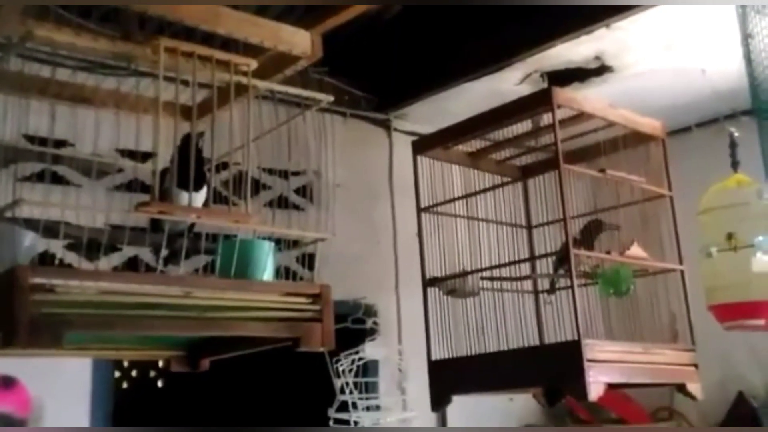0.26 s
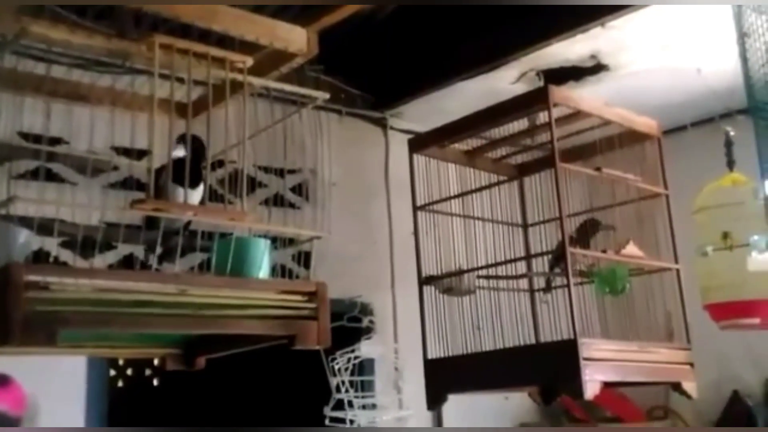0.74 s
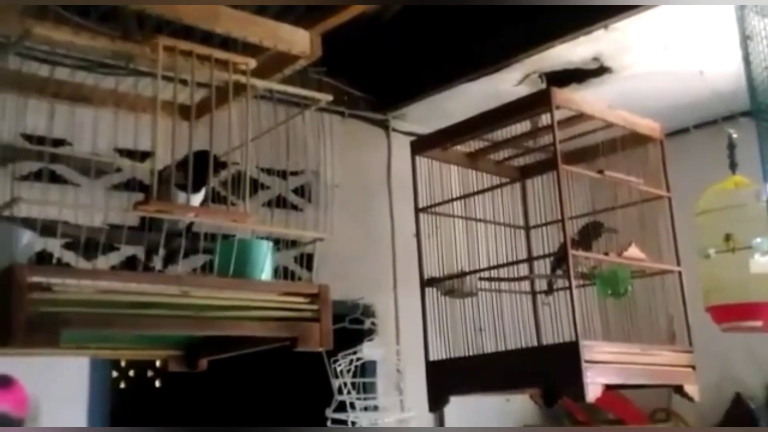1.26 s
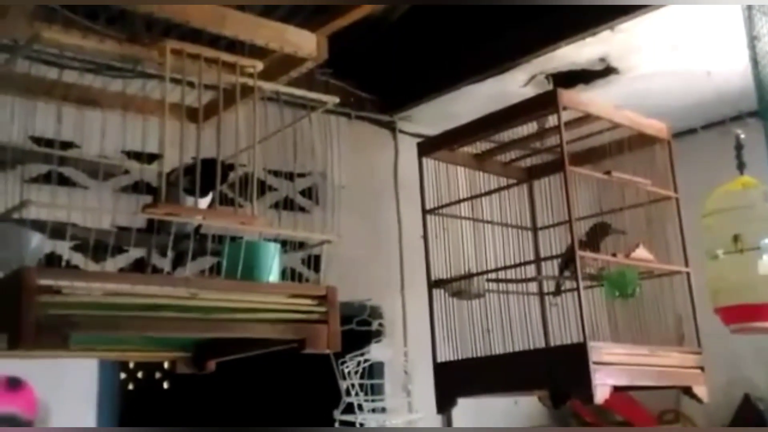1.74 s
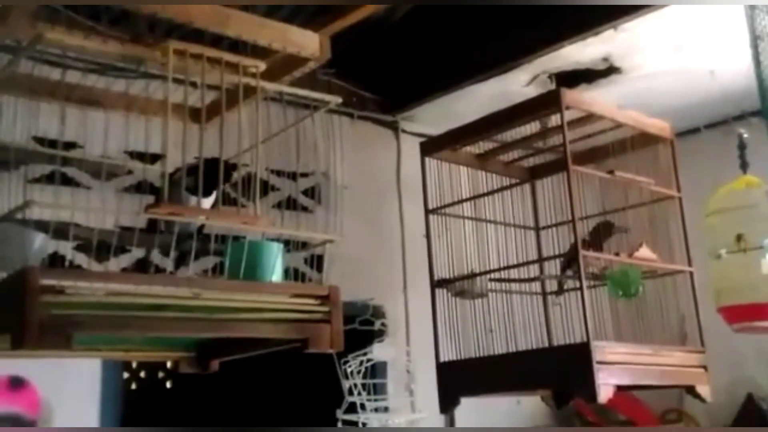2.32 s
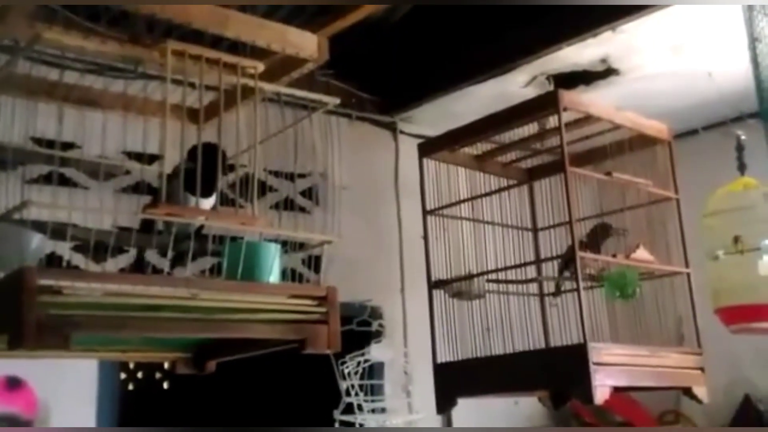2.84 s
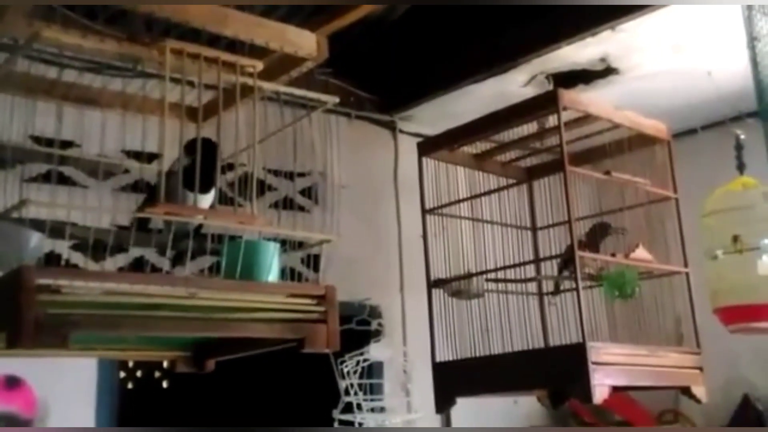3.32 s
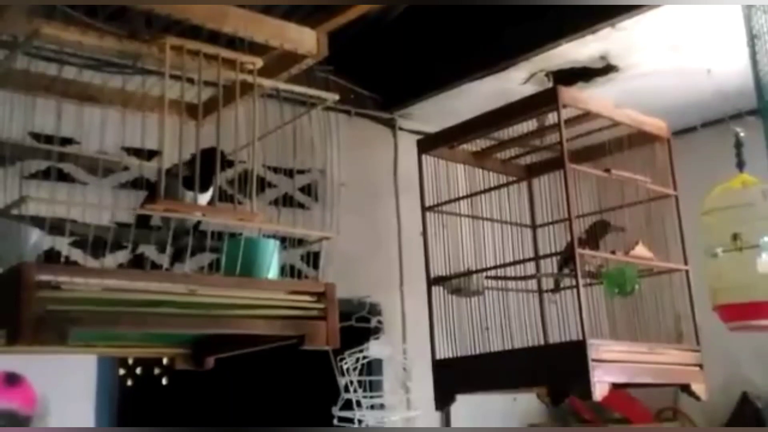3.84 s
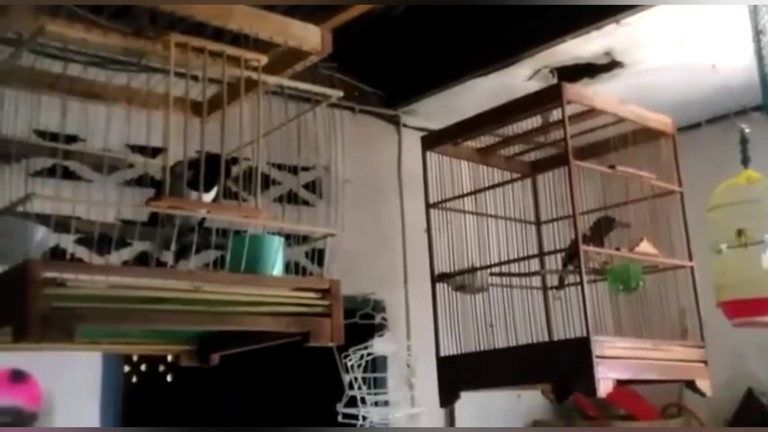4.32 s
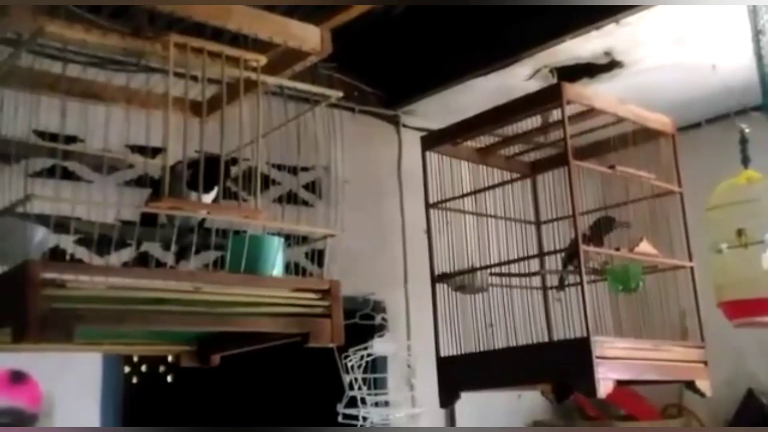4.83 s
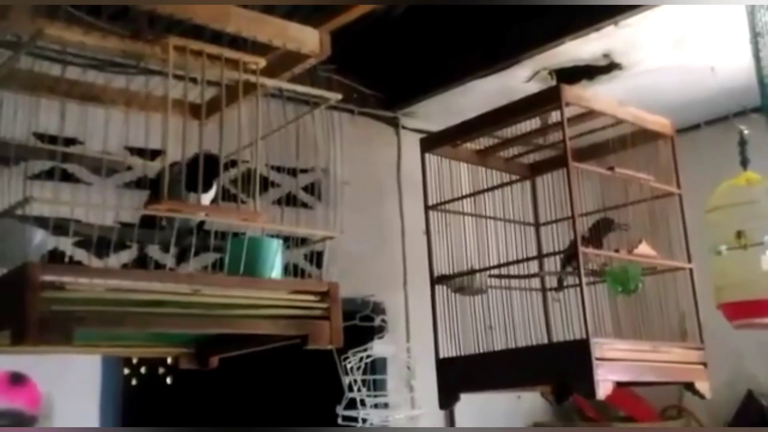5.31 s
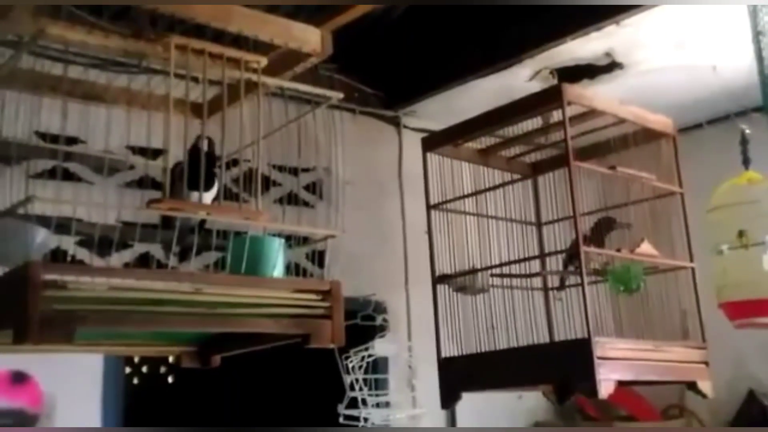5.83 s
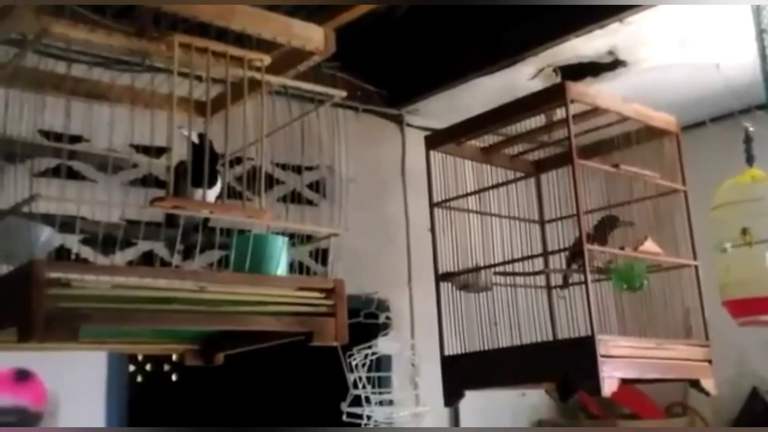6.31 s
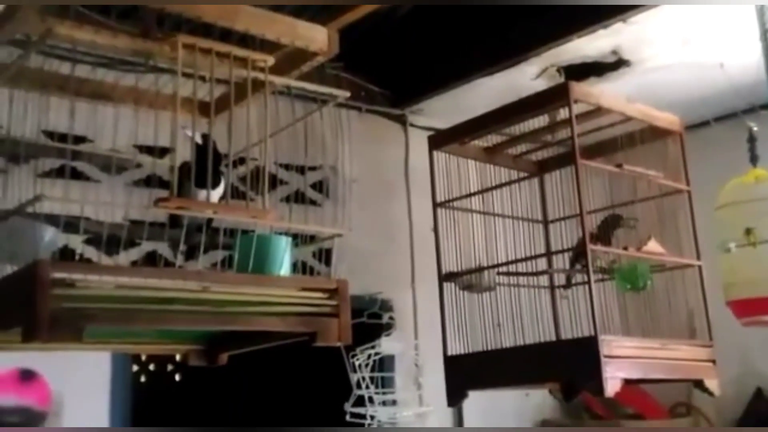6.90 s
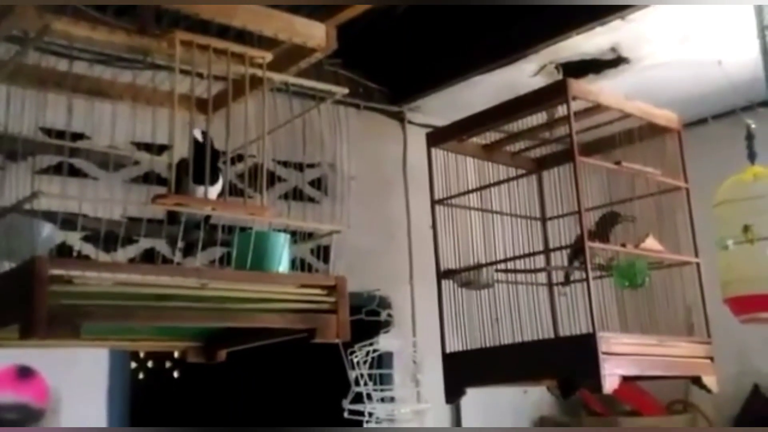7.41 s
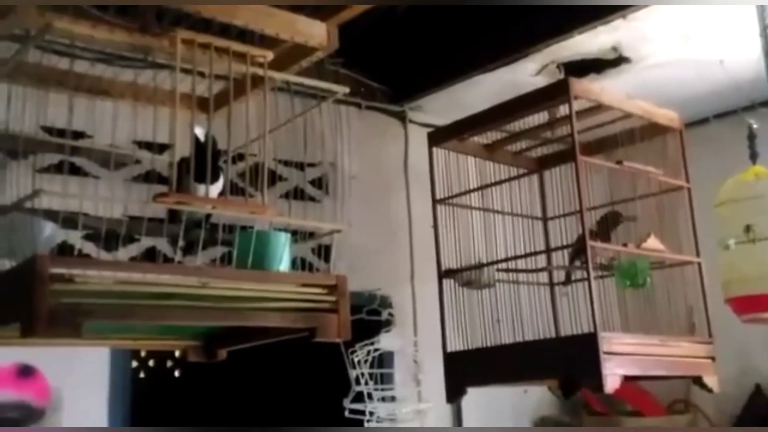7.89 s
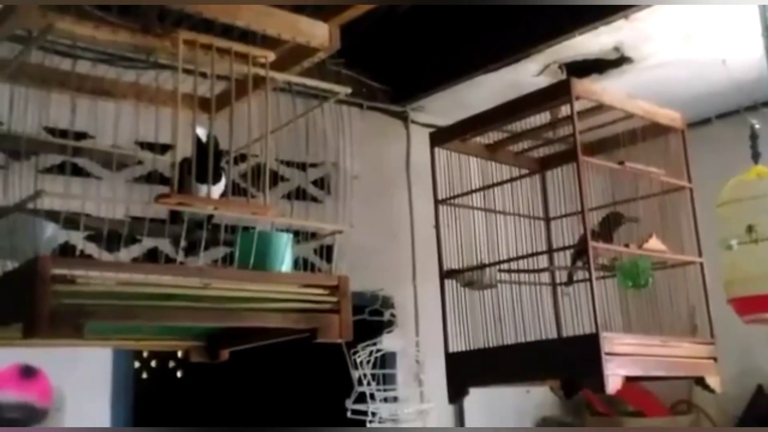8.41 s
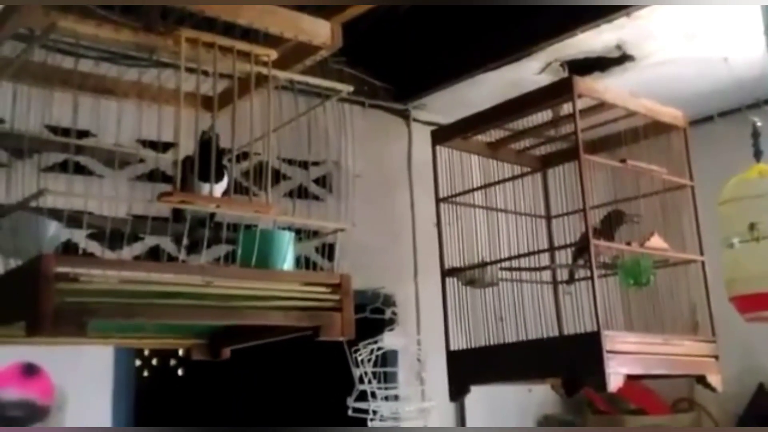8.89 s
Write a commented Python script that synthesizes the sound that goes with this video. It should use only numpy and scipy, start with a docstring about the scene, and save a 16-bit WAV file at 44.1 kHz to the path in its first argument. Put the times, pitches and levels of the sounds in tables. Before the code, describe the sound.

A caged songbird sings sliding whistles, hoarse squawks, chirps and dry rasps in a slightly echoing room.

```python
"""Inside a hard-walled house, a magpie-robin sings in a cage. Its voice box swings smoothly for
sliding whistles with a reedy edge and a repeated chirp, and unevenly for hoarse squawks; air
sputtering through its open beak makes dry rasps. Each voiced note is one bend of pitch on one
swell of effort, with overtones coloured by the throat. The room rings for about half a second
after each note, over a faint low murmur of air."""
import sys
import numpy as np
from scipy import signal
from scipy.fft import rfft, irfft
from scipy.io import wavfile

SR = 44100
rng = np.random.default_rng(int(sys.argv[2]) if len(sys.argv) > 2 else 0)


def output_pcm(signal):
    """Save a mono or channel-first signal as 16-bit PCM at the path in sys.argv[1].

    Samples are clipped to [-1, 1] before scaling.
    """
    pcm = np.clip(np.atleast_2d(signal).T, -1, 1) * 32767
    wavfile.write(sys.argv[1], SR, np.round(pcm).astype(np.int16))


N = 403515
TIME = np.arange(N) / SR
TOP_HZ = 14750  # upper limit of the treble
STEADIEST_HZ = 1100  # the pitch at which the voice box is most at ease
ATTACK_S, RELEASE_S = .024, .024  # a note's longest fade-in, and its fade-out

# Tone colour of the background air: frequency_hz, relative_db
AIR_COLOUR = [(15, -39), (25, -17.5), (111, -3.5), (205, -8.5), (267, -3.5), (534, -12.5), (679, -10),
              (755, -14.5), (910, -9.5), (1290, -12.5), (3010, -9), (3350, -14), (7450, -18), (8510, -19),
              (14500, -30.5)]
# Whistled notes, with levels before the trims in whistle(); a negative swell dies away:
# start_s, length_s, opening_hz, middle_hz, closing_hz, tone_db, overtones_db, swell_db
WHISTLE_NOTES = [ (0.0, 0.24, 942, 997, 1024, -23.5, -41.5, -9),
                 (.62, 0.13, 2857, 3067, 2850, -38.5, -34.5, 0),
                 (0.971, .16, 2434, 2430, 2374, -53, -42, 6.5),
                 (2.163, 0.044, 2800, 2910, 2577, -21.5, -32.5, -1),
                 (2.215, 0.052, 2628, 2702, 2964, -20.5, -37, -4),
                 (4.026, 0.021, 2980, 2860, 2260, -30.5, -40, 18),
                 (4.044, .09, 1960, 2068, 2020, -25, -35.5, -15),
                 (4.142, 0.076, 1906, 1838, 1958, -22, -33.5, -8.5),
                 (4.205, 0.071, 1970, 1903, 1802, -20.5, -30, -6),
                 (4.443, 0.041, 2980, 2446, 2660, -57, -33.5, 3),
                 (4.496, 0.077, 2660, 3166, 3475, -36, -32, -6),
                 (4.571, 0.038, 3490, 4260, 4980, -28, -41, 10),
                 (4.862, .16, 963, 911.5, 919, -33, -46.5, 1.5),
                 (5.316, 0.076, 1025, 965, 915, -30.5, -46.5, -1.5),
                 (5.392, 0.079, 917.5, 982, 927, -31, -37, 4.5),
                 (5.702, 0.082, 1020, 766, 703, -39, -66, 10),
                 (5.905, .03, 1589, 1307, 1100, -37, -58, -16),
                 (5.942, 0.064, 1025, 910, 844, -34.5, -45, 10),
                 (5.974, .088, 1550, 1339, 1393, -27.5, -35.5, -14.5),
                 (6.063, 0.091, 1856, 1764, 1620, -22, -33, -1.5),
                 (6.337, 0.093, 1524, 1352, 1204, -25.5, -34.5, 0),
                 (6.448, 0.1, 1177, 1103, 1235, -22.5, -45.5, -5),
                 (6.609, 0.083, 1844, 1614, 1245, -29.5, -40, 4.5),
                 (6.743, 0.067, 1462, 1323, 1216, -30, -46, 5),
                 (6.824, 0.079, 1193, 1110, 1103, -24.5, -37.5, -7.5),
                 (6.904, 0.043, 1137, 1283, 1433, -25, -40.5, 17.5),
                 (6.949, 0.019, 1427, 1650, 1870, -27, -36, -8),
                 (7.123, 0.074, 1433, 1205, 1170, -28, -46, 10.5),
                 (7.2, .076, 1100, 889.6, 887, -26.5, -44, -5.5),
                 (7.275, 0.043, 1446, 1383, 1322, -20.5, -39, 5),
                 (7.33, 0.03, 1444, 1462, 1490, -21.5, -32, -14),
                 (7.376, 0.0436, 1490, 1650, 1706, -23.5, -36.5, 4),
                 (7.425, 0.035, 1819, 2032, 2070, -20.5, -28, -13.5),
                 (7.428, 0.017, 1673, 1660, 1670, -20, -39, -10),
                 (7.551, 0.066, 1305, 1176, 1160, -27, -44.5, 5),
                 (7.609, 0.067, 994, 881, 924, -32.5, -54, -20),
                 (7.717, 0.021, 1716, 1830, 1857, -22.5, -34, -11),
                 (8.017, 0.17, 1323, 1068, 981, -33.5, -46.5, -3.5),
                 (8.131, 0.27, 912, 475.6, 762, -48, -55, 2),
                 (8.342, 0.055, 3210, 2630, 2487, -34.5, -36.5, 9),
                 (8.414, 0.093, 4330, 3967, 3920, -35, -41.5, -4),
                 (8.815, 0.051, 1002, 805, 650, -42.5, -75, 0), (8.931, 0.043, 904, 953, 966, -42, -42, -2),
                 (8.99, .088, 965, 925, 915, -25.5, -39.5, -4),
                 (9.129, 0.023, 2394, 2450, 2430, -27.5, -29, -7.5), ]
# Resonances of the throat and beak: frequency_hz, gain_db
THROAT_COLOUR = [(1000, -37), (1900, -5.5), (2400, 1), (2950, -6.5), (3900, -19), (4700, -9), (5800, 4),
                 (6700, -9.5), (7700, -9), (8500, -13), (9500, -12.5), (11500, -28), (13300, -18),
                 (15000, -37)]
# Toneless rasps and ticks: start_s, length_s, level_db, lower_edge_hz
RASP_BURSTS = [ (0.399, 0.12, -48.5, 1600), (1.254, 0.11, -55.5, 4940), (1.958, 0.26, -46, 2950),
               (4.01, 0.059, -46.5, 2160), (4.275, 0.034, -48, 4060), (4.812, 0.02, -50, 1100),
               (4.991, 0.017, -44, 2700), (5.156, 0.1, -32, 2660), (5.401, 0.098, -28.5, 2950),
               (5.648, 0.097, -30.5, 2260), (5.903, 0.018, -31.5, 1190), (6.284, 0.023, -44, 2300),
               (6.328, 0.088, -31, 3300), (6.645, 0.051, -39.5, 1880), (6.756, 0.062, -36.5, 2280),
               (8.541, 0.055, -29.5, 2850), (8.817, 0.023, -40.5, 830), ]
# Tone colour of air rushing through a wide-open beak: frequency_hz, gain_db
OPEN_BEAK_COLOUR = [(700, 21), (2800, -0.5), (4300, -2.5), (5500, -9), (7000, -6), (8400, -14),
                    (10100, -10.5), (11800, -20), (14500, -26)]
# Hoarse notes, with levels before the trim in squawk(): start_s, length_s, opening_hz, middle_hz,
# closing_hz, tone_db, low_overtones_db, high_overtones_db, swell_db, waver_share
SQUAWK_NOTES = [ (0.609, .085, 931, 951, 909, -47, -28, -32.5, -4, 0.073),
                (.758, .054, 684, 774, 870, -44.5, -31.5, -28, 7, 0.0302),
                (0.809, 0.11, 898.4, 868, 771, -42, -26.5, -26.5, -4.5, 0.012),
                (1.968, 0.028, 1143, 1689, 2320, -29, -35, -28.5, 0.5, 0.051),
                (1.994, 0.071, 2274, 2614, 2810, -23, -37, -40.5, -7, 0.062),
                (2.983, 0.076, 951, 1033, 930, -40, -45, -46.5, 4, 0.07),
                (3.177, 0.061, 972, 1042, 951, -41, -54.5, -47, -5, 0.086),
                (3.608, .058, 942, 902, 876, -42.5, -46.5, -49.5, 10, 0.067),
                (4.286, .068, 1484, 1638, 1440, -30, -50, -37.5, -3, 0.047),
                (5.572, 0.079, 2610, 2424, 2250, -32.5, -55, -54, -2, 0.077),
                (5.675, 0.082, 2950, 3564, 3200, -36, -57, -58, 2, 0.066),
                (8.184, 0.11, 1707, 1550, 1557, -33.5, -53, -46, -1.5, 0.0336),
                (8.522, 0.045, 1546, 1028, 672, -40.5, -52, -63, 10, .044), ]
# Two-part chirps, with levels before the trims in whistle():
# start_s, flick_delay_s, arch_db, flick_db, flick_overtones_db
CHIRP_NOTES = [(1.461, 0.081, -27, -20, -36.5), (1.795, .078, -29, -29.5, -52)]
# How long the room's echo takes to fall by 60 dB: frequency_hz, ring_s
ROOM_RING_TIMES = [(700, 0.47), (1800, 0.58), (4900, 0.58), (9000, 0.42), (14000, 0.38)]


def undb(db):
    """Turn decibels into a gain to multiply by."""
    return 10 ** (np.asarray(db) / 20)


def unit(x):
    """Scale a signal to an average (rms) level of 1."""
    return x / np.sqrt(np.mean(x ** 2) + 1e-20)


def along(points, hz):
    """Read between the rows of a (frequency, value) table, spacing octaves evenly."""
    f, value = np.transpose(points)
    return np.interp(np.log(hz + 1), np.log(f), value)


def noise(size, shape):
    """Noise of level 1, where shape(hz) sets the strength of each frequency."""
    spectrum = rfft(rng.standard_normal(size))
    return unit(irfft(spectrum * shape(np.fft.rfftfreq(size, 1 / SR)), size))


def flutter(size, rate_hz):
    """A random wobble, up to about the given rate."""
    return noise(size, lambda f: 1 / (1 + (f / rate_hz) ** 4))


def add(track, start_s, sound):
    """Mix a sound into a track; it may already be under way at time zero."""
    i = int(start_s * SR)
    part = sound[max(-i, 0):max(N - i, 0)]
    track[max(i, 0):max(i, 0) + len(part)] += part


def background(air_db=-57, rumble_boost_db=10, hold_s=1.0, fade_s=1.54, drone_hz=278, drone_db=-70):
    """Soft air, a rumble that eases off, and a faint drone from a low room resonance."""
    air = undb(air_db + .08 * flutter(N, 1.4)) * noise(N, lambda f: undb(along(AIR_COLOUR, f)))
    bass = signal.sosfilt(signal.butter(1, 600, fs=SR, output="sos"), air)
    fade = np.clip(1 - (TIME - hold_s) / fade_s, 0, 1)
    rumble = (undb(rumble_boost_db * fade) - 1) * bass
    drone = noise(N, lambda f: 1 / (1 + ((f - drone_hz) / 22) ** 2))
    return air + rumble + undb(drone_db) * drone


def note_shape(length_s, pitches_hz, swell_db, waver, build_s=.027):
    """One push of effort: the fade in and out, the tone and overtone gains, and the bending pitch."""
    t = np.arange(-ATTACK_S / 2, length_s + RELEASE_S / 2, 1 / SR)
    attack_s = ATTACK_S * undb(.81 * min(swell_db, 0))  # a note that begins loud starts more sharply
    ramp = np.clip(np.minimum(t / attack_s + .5, (t[-1] - t) / RELEASE_S), 0, 1)
    fade = np.sin(np.pi / 2 * ramp) ** 2
    progress = np.clip(t / length_s, 0, 1)
    slope_db = swell_db * (progress - .5)
    arch = .5 - (2 * progress - 1) ** 2  # mid-note, the tone lifts a little and the overtones dip
    build = np.minimum((t - t[0]) / build_s, 1) ** 2  # overtones arrive later than the tone
    bend = np.polyfit([0, .5, 1], np.log(pitches_hz), 2)
    hz = np.exp(np.polyval(bend, progress)) * (1 + waver * flutter(len(t), 170))
    return fade, undb(slope_db + .5 * arch), build * undb(slope_db - 2 * arch), hz


def overtones(phase, hz, first, flicker_db=6, even_db=-1, dull_above_hz=7000):
    """Multiples of the pitch: each flickers alone and swells as it slides through a throat resonance."""
    k = np.arange(first, 18)[:, None]
    flicker = np.array([flutter(len(hz), 45) for _ in k])
    # the higher the note, the weaker its top overtones
    dull_db = -4 * np.log2(hz / STEADIEST_HZ) * np.log2(np.maximum(k * hz / dull_above_hz, 1))
    source_db = even_db * (k % 2 == 0) + dull_db
    gain = undb(along(THROAT_COLOUR, k * hz) + source_db + flicker_db * flicker) * (k * hz < TOP_HZ)
    return np.sum(gain * np.sin(k * phase), axis=0) / np.sqrt(np.sum(gain ** 2, axis=0) / 2 + 1e-12)


def whistle_waver(hz, level_db):
    """The share by which the pitch wavers: the bird holds loud notes in mid-range best."""
    strain_db = 7 * abs(np.log2(hz / STEADIEST_HZ)) - .5 * (level_db + 25)
    return min(.0088 * undb(strain_db), .036)


def whistle(length_s, pitches_hz, tone_db, overtones_db, swell_db, waver,
            tone_trim_db=-3, overtones_trim_db=-1.5):
    """The voice box swings in an almost pure tone; pressed harder, it adds overtones and a little hiss."""
    fade, tone_gain, overtone_gain, hz = note_shape(length_s, pitches_hz, swell_db, waver)
    n = len(hz)
    rough_hz = hz * (1 + .0048 * flutter(n, 900))
    phase = 2 * np.pi * np.cumsum(rough_hz) / SR
    tone = tone_gain * undb(tone_db + tone_trim_db) * np.sqrt(2) * np.sin(phase)
    hiss = noise(n, lambda f: undb(along(THROAT_COLOUR, f)) * (f > 1000))
    reedy_edge = overtone_gain * (overtones(phase, hz, first=2) + undb(-11) * hiss)
    return fade * (tone + undb(overtones_db + overtones_trim_db) * reedy_edge)


def rasp(length_s, level_db, lower_edge_hz, sputter_db=4, peaks_db=3, opening_share=.32, split_hz=4600):
    """Air sputters through the beak: the low resonances sound first, the treble follows as it opens."""
    n = int(length_s * SR)
    f = np.fft.rfftfreq(n, 1 / SR)
    sputter = rng.standard_normal(n) * undb(sputter_db * flutter(n, 300))
    # each rasp gets its own random resonances
    peaks = np.column_stack([np.geomspace(1000, TOP_HZ, 40), peaks_db * rng.standard_normal(40)])
    beak = undb(along(OPEN_BEAK_COLOUR, f) + along(peaks, f))
    bass_cut = 1 / np.sqrt(1 + (lower_edge_hz / (f + 1)) ** 8)
    air = unit(irfft(rfft(sputter) * beak * bass_cut, n))
    low = signal.sosfiltfilt(signal.butter(3, split_hz, fs=SR, output="sos"), air)
    opening = np.minimum(np.arange(n) / (opening_share * n), 1)
    return undb(level_db) * (opening * low + opening ** 2 * (air - low)) * signal.windows.tukey(n, .4)


def squawk(length_s, pitches_hz, tone_db, low_db, high_db, swell_db, waver, high_trim_db=-2):
    """The voice box swings unevenly; when forced, strong and weak swings alternate, an octave down."""
    fade, tone_gain, overtone_gain, hz = note_shape(length_s, pitches_hz, swell_db, waver)
    n = len(hz)
    phase = 2 * np.pi * np.cumsum(hz) / SR
    tone = tone_gain * undb(tone_db) * np.sqrt(2) * np.sin(phase)
    forced = 1 / (1 + undb(-42 - low_db))  # nears 1 when the low overtones are loud
    strong_weak = unit(1 + .73 * forced * np.sin(phase / 2 + .5 * flutter(n, 68)))
    low = tone_gain * undb(low_db) * unit(np.sin(2 * phase) + .035 * forced * np.sin(3 * phase))
    high = overtone_gain * undb(high_db + high_trim_db) * overtones(phase, hz, first=3)
    shake = unit(1 + .36 * flutter(n, 210))
    return fade * (tone + strong_weak * (low + high)) * shake


def chirp(arch_db, flick_db, flick_overtones_db):
    """Two quick whistles: a falling arch and a flick upward."""
    arch = whistle(.074, (2020, 2070, 1160), arch_db, overtones_db=-52.5, swell_db=-2.5, waver=.059)
    flick = whistle(.05, (2450, 3600, 3790), flick_db, flick_overtones_db, swell_db=8, waver=.013)
    return arch, flick


def bird():
    """Whistles, rasps, squawks and chirps, all from one perch."""
    song = np.zeros(N)
    lead_s = ATTACK_S / 2  # a voiced note is halfway through its fade-in at its start time
    for start_s, length_s, *pitches_hz, tone_db, overtones_db, swell_db in WHISTLE_NOTES:
        waver = whistle_waver(pitches_hz[1], tone_db)
        add(song, start_s - lead_s, whistle(length_s, pitches_hz, tone_db, overtones_db, swell_db, waver))
    for start_s, flick_delay_s, *levels_db in CHIRP_NOTES:
        arch, flick = chirp(*levels_db)
        add(song, start_s - lead_s, arch)
        add(song, start_s + flick_delay_s - lead_s, flick)
    for start_s, length_s, opening_hz, middle_hz, closing_hz, *voice in SQUAWK_NOTES:
        add(song, start_s - lead_s, squawk(length_s, (opening_hz, middle_hz, closing_hz), *voice))
    for start_s, length_s, level_db, lower_edge_hz in RASP_BURSTS:
        add(song, start_s, rasp(length_s, level_db, lower_edge_hz))
    return song


def room(song, direct_db=-3, slaps_db=-6, tail_db=-2, build_s=.0048, slap_count=10):
    """Direct sound, quick slaps off the ceiling and walls, then a wash of echo that dulls as it dies."""
    t = TIME[:SR]
    spectrum, f = rfft(rng.standard_normal(SR)), np.fft.rfftfreq(SR, 1 / SR)
    centres_hz, rings_s = np.transpose(ROOM_RING_TIMES)
    tail = 0
    for share, ring_s in zip(np.eye(len(rings_s)), rings_s):
        band = irfft(spectrum * np.interp(f, centres_hz, share), SR)
        tail = tail + band * np.exp(-np.log(1000) * t / ring_s) / np.sqrt(ring_s)
    tail = unit(tail * (1 - np.exp(-t / build_s))) / np.sqrt(SR)
    echoes = undb(tail_db) * tail
    slaps = (SR * rng.uniform(.002, .022, slap_count)).astype(int)
    echoes[slaps] += undb(slaps_db) * rng.choice([-1, 1], slap_count) / np.sqrt(slap_count)
    echoes[0] += undb(direct_db)
    return signal.fftconvolve(song, echoes)[:N]


def scene():
    """The bird in its room over the murmur of air, the same at both ears."""
    return np.tile(room(bird()) + background(), (2, 1))


def record(dry):
    """A steep filter cuts off the very top of the treble."""
    return signal.sosfilt(signal.ellip(10, .2, 80, TOP_HZ, fs=SR, output="sos"), dry)


dry = scene()
out = record(dry)
output_pcm(out)
```